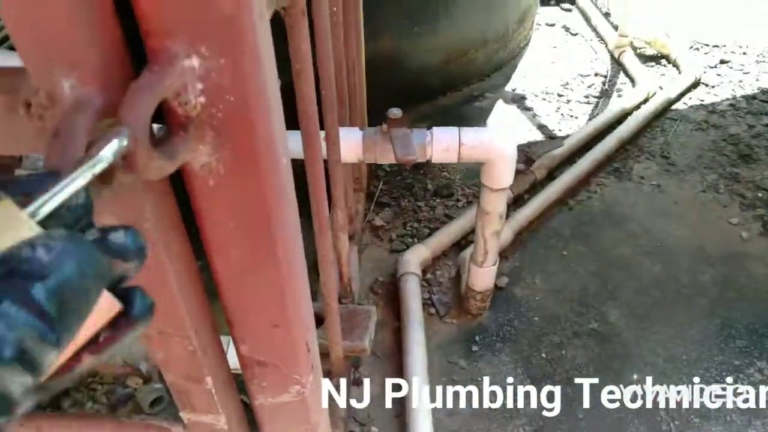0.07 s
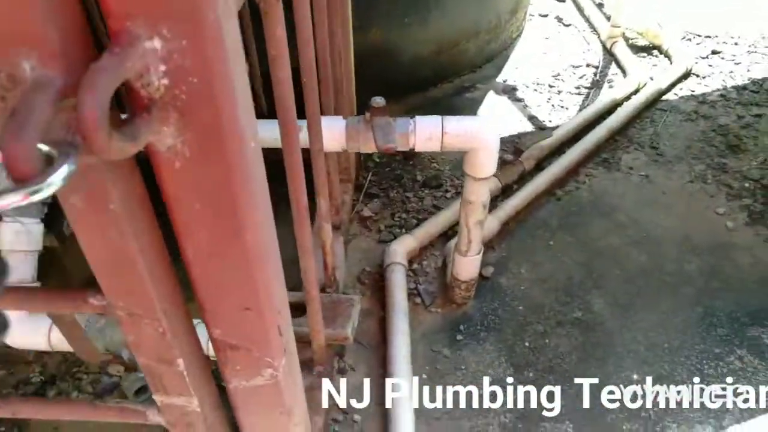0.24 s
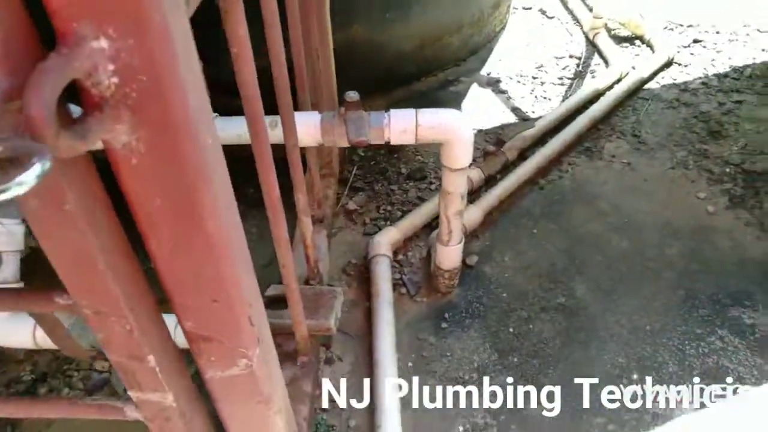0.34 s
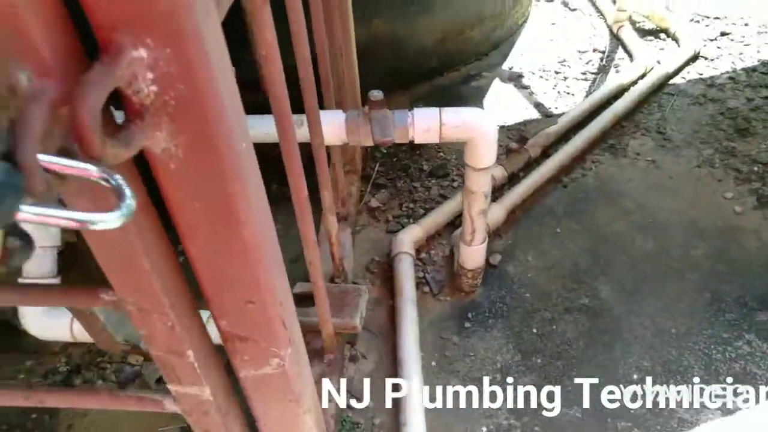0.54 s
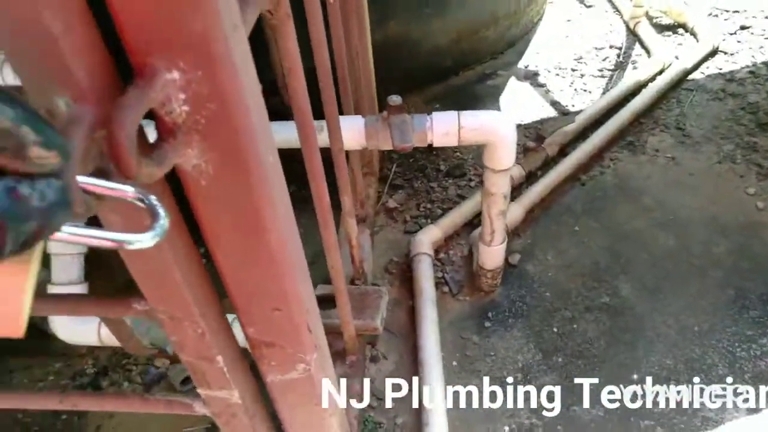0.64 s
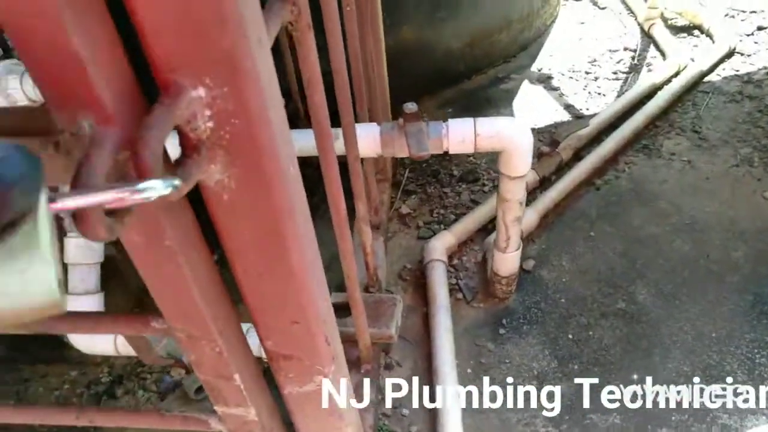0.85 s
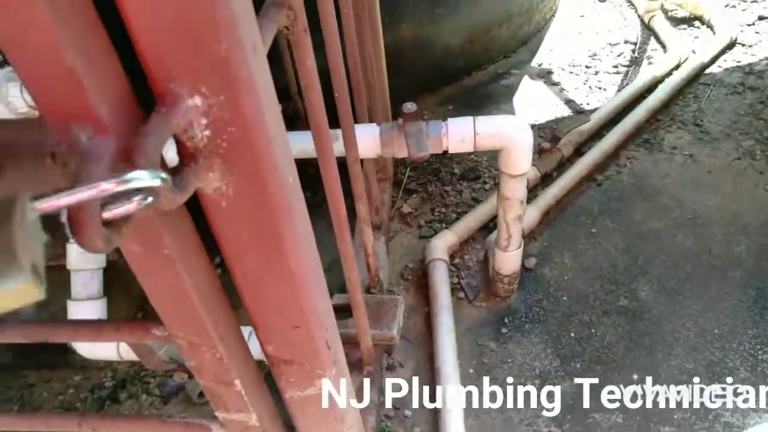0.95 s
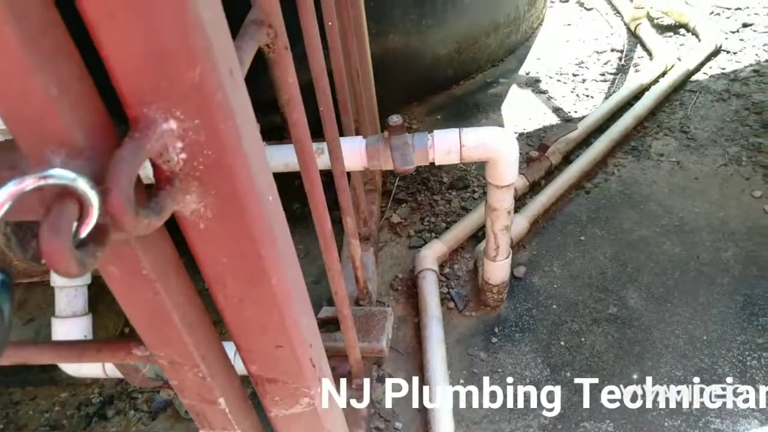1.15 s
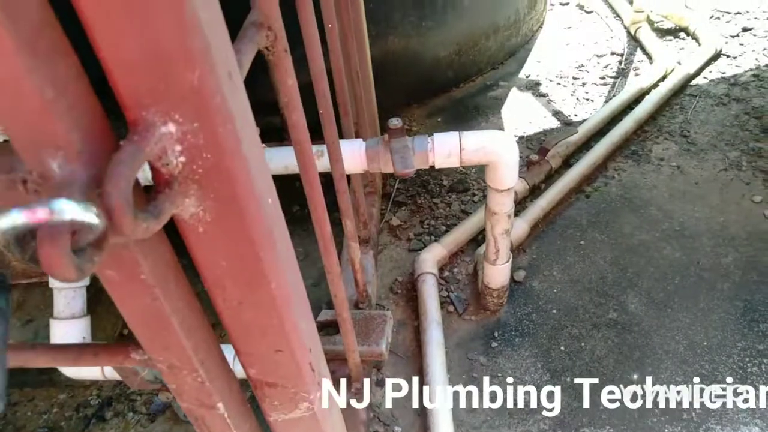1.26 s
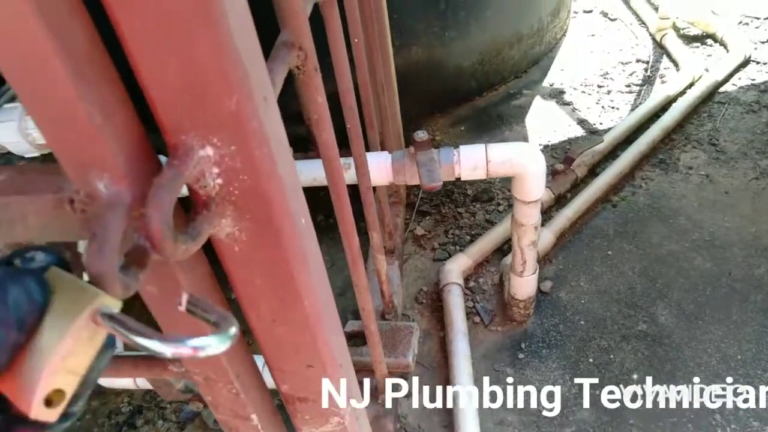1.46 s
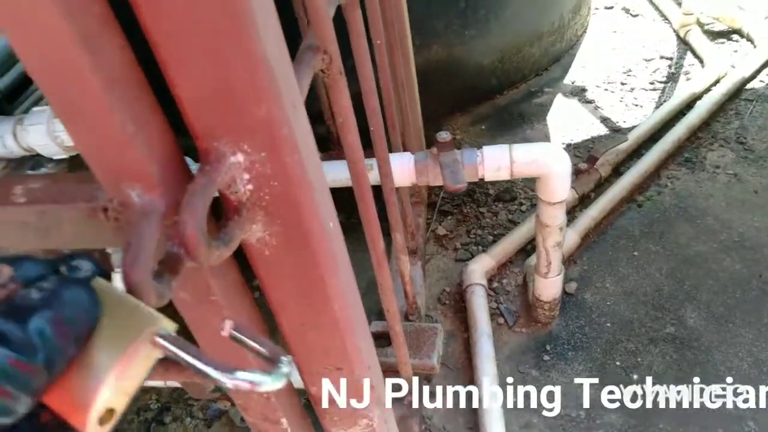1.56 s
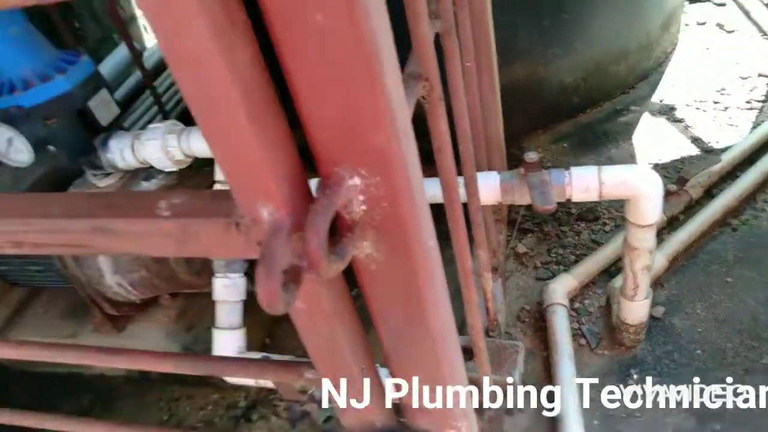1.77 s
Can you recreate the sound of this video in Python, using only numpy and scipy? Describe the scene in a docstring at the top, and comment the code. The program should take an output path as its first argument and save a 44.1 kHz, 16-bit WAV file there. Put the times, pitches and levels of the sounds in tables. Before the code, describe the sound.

Close to the microphone, a padlock knocks sharply on a gate's metal loops, ringing briefly. It then rattles and scrapes more quietly while the gate rumbles softly, ending on one lower clank. A faint, steady outdoor background lies underneath.

```python
"""Steel knocks and scrapes, close by: a padlock is worked out of the loops of a gate, outdoors.
Each time its shackle (the U-shaped bar) hits or rubs a loop, the lock rings bright and short
and the gate rings lower and longer. The smooth shackle also skids with a thin hiss.
The gate rumbles softly as it shifts, over a steady low background."""
import sys
import numpy as np
from scipy import signal
from scipy.fft import rfft, irfft
from scipy.io import wavfile

SR = 44100
rng = np.random.default_rng(int(sys.argv[2]) if len(sys.argv) > 2 else 0)


def output_pcm(signal):
    """Save a mono or channel-first signal as 16-bit PCM at the path in sys.argv[1].

    Samples are clipped to [-1, 1] before scaling.
    """
    pcm = np.clip(np.atleast_2d(signal).T, -1, 1) * 32767
    wavfile.write(sys.argv[1], SR, np.round(pcm).astype(np.int16))


N = 79380  # 1.8 seconds

# The spots where the shackle meets the gate: the loop, its rim and the post.
SPOTS = ["loop", "rim", "post"]


def padlock(spot):
    """Knocks (single pushes) and scrapes (many tiny ones) at one spot set the same steel ringing."""
    # Each row: start in seconds, spot, then the level in dB of five bands from low to high.
    knock_rows = [ (0.001, "rim", -32.5, -38, -41, -42, -58), (0.2356, "loop", -22.5, -16, -16, -12, -29.5),
                  (0.398, "rim", -24, -24, -21.5, -17, -36.5), (0.471, "rim", -52, -52, -53, -43, -65),
                  (0.507, "rim", -47, -37, -34, -30, -51), (0.600, "rim", -33.5, -42.5, -51, -42.5, -54.5),
                  (0.816, "post", -45, -42, -56, -49, -54), (0.894, "post", -34, -32.5, -37, -40, -53),
                  (0.945, "rim", -38, -41, -41.5, -48.5, -70), (1.044, "loop", -65, -66, -68, -59.5, -85),
                  (1.096, "rim", -45.5, -48.5, -52.5, -55, -90), (1.113, "loop", -55, -45, -51, -47, -77),
                  (1.166, "rim", -40.5, -41, -39, -47, -81), (1.212, "rim", -35, -48, -44.5, -39.5, -68),
                  (1.303, "post", -46.5, -42.5, -44, -47, -66),
                  (1.372, "loop", -40.5, -43.5, -41.5, -31.5, -48),
                  (1.4432, "post", -24.5, -25, -33, -41.5, -65)]
    # Each row: start in seconds, length in seconds, spot, then the same five levels in dB.
    scrape_rows = [ (0.010, 0.097, "rim", -40, -43, -50, -50.5, -74),
                   (0.178, 0.095, "loop", -48.5, -53, -56, -47, -76),
                   (0.591, 0.068, "post", -47, -51, -55, -49.5, -54),
                   (0.771, 0.03, "post", -51, -51.5, -64, -44, -51),
                   (0.895, 0.065, "loop", -42.5, -41, -44, -44, -70),
                   (1.106, 0.07, "rim", -58, -50, -52, -57, -76),
                   (1.166, 0.055, "rim", -43, -36.5, -40, -41, -65),
                   (1.298, .060, "loop", -39, -37.5, -45.5, -49, -62.5),
                   (1.384, 0.053, "rim", -39.5, -48, -54, -47.5, -60)]
    rings = steel_ring(spot)
    force = np.zeros((len(rings), N))
    for start, where, *db in knock_rows:
        if where == spot:
            force[:, int(start * SR)] += amp(db)
    for start, length, where, *db in scrape_rows:
        if where == spot:
            force += np.outer(amp(db), stick_and_slip(start, length))
    # Convolving starts a copy of the ring at every push.
    return sum(signal.fftconvolve(push, ring)[:N] for push, ring in zip(force, rings))


def steel_ring(spot):
    """One contact rings the natural tones of lock and gate. Gives five bands that start equally strong."""
    # Each entry: the pitch of one tone in Hz. Those below 3000 Hz are the gate's, the rest the lock's.
    tone_pitches = [355, 577, 603, 664, 778, 933, 997, 1096, 1130, 1190, 1221, 1295, 1403, 1440, 1474, 1617,
                    1740, 1816, 1924, 2010, 2196, 2606, 2643, 2776, 3075, 3426, 3477, 3640, 4009, 4245,
                    4930, 4980, 5652, 5836, 6659, 6772, 6955, 7495, 7748, 7991, 8154]
    # Each row, one per tone: seconds to fade by 60 dB, then level in dB when hit on loop, rim and post.
    tone_rows = [(2.5, -35.5, -41.5, -57.5), (1.0, -38.5, -38.5, -29.5), (1.34, -46, -37, -33.5),
                 (0.8, -29.5, -34.5, -40), (0.83, -27.5, -40, -30.5), (1.3, -53.5, -35.5, -38.5),
                 (1.58, -31.5, -36, -35), (1.2, -37, -35, -37), (0.31, -28, -26.5, -25),
                 (1.3, -26, -31.5, -39), (1.2, -29, -34, -37), (0.58, -42, -46.5, -30.5),
                 (2.2, -39, -35, -36.5), (0.9, -30.5, -28, -32.5), (1.2, -32, -49, -40.5),
                 (0.16, -41.5, -46.5, -24), (0.5, -27.5, -26, -44), (0.41, -26.5, -25, -24),
                 (0.53, -24, -27, -25.5), (0.81, -34.5, -35, -28.5), (0.71, -37, -49, -36),
                 (0.13, -21, -32, -33.5), (0.46, -27.5, -38, -32), (0.26, -25, -27.5, -27),
                 (0.35, -37.5, -33.5, -49), (0.25, -19.5, -30, -21), (0.24, -24, -40.5, -41),
                 (0.3, -20, -43, -21.5), (0.22, -36.5, -24.5, -42), (0.26, -28.5, -25.5, -41),
                 (0.4, -30.5, -32, -54), (0.28, -26, -30.5, -50), (0.3, -39.5, -32, -40),
                 (0.17, -42.5, -22.5, -22), (0.058, -20, -18, -49), (0.15, -27, -23, -24),
                 (0.14, -19.5, -34, -46), (0.13, -14, -17, -36), (0.22, -26.5, -16, -23),
                 (0.17, -24, -29.5, -22), (0.12, -27, -28.5, -38)]
    # Each entry: a border of the five bands in Hz, from low to high.
    band_edges = [250, 1600, 3000, 5200, 10600, 17000]
    t = np.arange(N) / SR
    onset = slice(0, SR // 40)  # the first 25 ms
    crowd = weak_tones(t)
    ring = amp(-14) * crowd / rms(crowd[onset])
    swing = waver()
    strength, phase = abs(swing), np.angle(swing)
    for hz, (t60, *db) in zip(tone_pitches, tone_rows):
        shift = rng.integers(N)  # each tone wavers in its own way
        angle = 2 * np.pi * (hz * t + rng.random()) + np.roll(phase, shift)
        tone = np.roll(strength, shift) * np.sin(angle)
        ring += amp(db[SPOTS.index(spot)]) * tone * build_up(t, hz) * fade(t, t60)
    crack = np.diff(rng.standard_normal(N + 1)) / 2  # bright noise for the instant of contact
    ring += amp(-16) * crack * np.exp(-t / .0015)
    bands = [bandpass(ring, lo, hi, order=7) for lo, hi in zip(band_edges, band_edges[1:])]
    return [band / rms(band[onset]) for band in bands]


def weak_tones(t):
    """The steel's many weaker tones blur into noise that dies away in an early and a late part."""
    # Each row: pitch in Hz, relative level in dB, seconds to fade by 60 dB for the early and late part.
    crowd_rows = [(250, -20, 1, 1.1), (450, -8, 1, 1.0), (650, -3, 0.58, 0.56), (1200, 0, 0.32, .8),
                  (1900, 2, 0.39, 0.31), (2830, -0.5, 0.23, 0.6), (4400, 4, 0.16, 0.39),
                  (5350, -5, 0.14, 0.27), (7200, 4.5, 0.087, .46), (9500, -4, .1, 0.33),
                  (12500, -22.5, .1, .55), (15500, -20.5, .07, .4)]
    row_hz, row_db, early_s, late_s = np.array(crowd_rows).T
    f = np.maximum(np.fft.rfftfreq(N, 1 / SR), 1)
    spectrum = rfft(rng.standard_normal(N)) * bunching(f) * amp(at_pitch(f, row_hz, row_db))
    edges = np.geomspace(200, 17000, 17)
    fading_time = np.maximum(t - .011, 0)  # the fade begins after 11 ms
    crowd = 0
    for lo, hi in zip(edges, edges[1:]):
        hz = np.sqrt(lo * hi)
        early = fade(fading_time, at_pitch(hz, row_hz, early_s))
        late = amp(-12.5) * fade(fading_time, at_pitch(hz, row_hz, late_s))
        band = irfft(spectrum * (f >= lo) * (f < hi), N)
        crowd += band * build_up(t, hz) * np.hypot(early, late)
    return crowd


def bunching(f, depth_db=7):
    """Weak tones bunch into random peaks and valleys, wider apart in the treble."""
    heights = np.clip(rng.standard_normal(2000), -2, 1)
    spacing_hz = 25 + .01 * f
    place = np.cumsum(1 / spacing_hz) * SR / N
    return amp(depth_db * np.interp(place, np.arange(len(heights)), heights))


def waver(depth=.68, rate_hz=28):
    """A tone wavers as it dies: random swings in its strength and its phase (place in the cycle)."""
    f = np.fft.fftfreq(N, 1 / SR)
    swing = np.fft.ifft(np.exp(2j * np.pi * rng.random(N) - (f / rate_hz) ** 2))
    return 1 + depth * swing / rms(abs(swing))


def build_up(t, hz, cycles=1.3):
    """A tone needs a few cycles to reach its strength."""
    return 1 - np.exp(-t * hz / cycles)


def fade(t, t60):
    """A vibration left alone drops by 60 dB every t60 seconds."""
    return np.exp(-np.log(1000) * t / t60)


def stick_and_slip(start, length, slips_per_s=600, spread_db=1, bite_s=.015):
    """Sliding steel catches and lets go: tiny uneven pushes, with the energy of one knock per 40 ms."""
    t = np.arange(N) / SR - start
    size = amp(-spread_db * rng.standard_normal(N)) * rng.choice([-1, 1], N)
    slipping = rng.random(N) < slips_per_s / SR
    pushes = size * slipping * np.clip(t / bite_s, 0, 1) * (t < length)
    return pushes / (rms(pushes) * np.sqrt(N)) * np.sqrt(length / .04)


def grazing_ticks(decay_s=.0012):
    """The shackle grazes the loop just before the first loud clank, with hardly any ring."""
    # Each row: start in seconds, level in dB.
    tick_rows = [(0.2145, -49), (0.2278, -21)]
    t = np.arange(N) / SR
    grain = bandpass(rng.standard_normal(N), lo_hz=1680, hi_hz=8500)
    loudness = sum(amp(db) * (t >= start) * np.exp(-abs(t - start) / decay_s) for start, db in tick_rows)
    return grain / rms(grain) * loudness


def shackle_skids():
    """The smooth shackle skids with a thin hiss."""
    # Each row: start in seconds, length in seconds, pitch in Hz, band width in Hz, level in dB.
    skid_rows = [(.585, .10, 8700, 2200, -44.5), (.66, 0.13, 8500, 1200, -53),
                 (.772, 0.049, 8830, 2400, -42), (.892, 0.039, 10160, 900, -46.5)]
    return noise_swells(skid_rows)


def gate_rumble():
    """The gate rumbles softly as it shifts."""
    # Each row: start in seconds, length in seconds, pitch in Hz, band width in Hz, level in dB.
    shift_rows = [(.60, .15, 195, 81.32, -34), (.61, 0.31, 101, 35.2, -41.5), (.76, 0.27, 240, 141, -43),
                  (0.974, 0.14, 286.3, 25, -42.5), (1.0, 0.17, 354, 25, -42.5)]
    return noise_swells(shift_rows)


def background():
    """A steady outdoor rumble and a faint, distant hiss."""
    # Each row of both tables: pitch in Hz, relative level in dB.
    rumble_shape = [(25, -32.5), (45, -13.5), (65, -3.5), (100, 1), (135, -3), (180, -0.5), (240, -9),
                    (300, 0.5), (360, -6), (500, -9.5)]
    hiss_shape = [(300, -11.5), (550, 9.5), (1200, -2), (2000, -14.5), (3500, -37), (5500, -35),
                  (7500, -22.5), (11000, -35), (16000, -32)]
    return amp(-43) * steady_noise(rumble_shape) + amp(-51.5) * steady_noise(hiss_shape)


def noise_swells(rows):
    """Each row makes a band of noise that swells and fades once."""
    t = np.arange(N) / SR
    total = 0
    for start, length, hz, width, db in rows:
        band = bandpass(rng.standard_normal(N), hz - width / 2, hz + width / 2, order=2)
        progress = np.clip((t - start) / length, 0, 1)
        total += amp(db) * band / rms(band) * np.sqrt(abs(np.sin(np.pi * progress)))
    return total


def steady_noise(points):
    """Noise of average level 1, shaped by (Hz, dB) points and falling away beyond them."""
    hz, db = np.array(points).T
    f = np.maximum(np.fft.rfftfreq(N, 1 / SR), 1)
    roll_off = np.minimum(1, np.minimum(f / hz[0], hz[-1] / f)) ** 4
    shaped = irfft(rfft(rng.standard_normal(N)) * roll_off * amp(at_pitch(f, hz, db)), N)
    return shaped / rms(shaped)


def at_pitch(hz, row_hz, values):
    """Read a value between a table's rows, giving each octave equal room."""
    return np.interp(np.log(hz), np.log(row_hz), values)


def bandpass(x, lo_hz, hi_hz, order=3):
    """Keep the sound between two pitches."""
    return signal.sosfilt(signal.butter(order, [lo_hz, hi_hz], "band", fs=SR, output="sos"), x)


def amp(db):
    """Turn decibels into a multiplier."""
    return 10 ** (np.asarray(db) / 20)


def rms(x):
    """The average level of a signal."""
    return np.sqrt(np.mean(x ** 2)) + 1e-12


def scene():
    """Add all the sounds into one channel."""
    clanks = sum(padlock(spot) for spot in SPOTS)
    return (clanks + grazing_ticks() + shackle_skids() + gate_rumble() + background())[None]


def record(dry):
    """Round off the loudest peaks and cut the highest treble."""
    ceiling, top_hz = .9, 15700
    rounded = ceiling * np.tanh(dry / ceiling)
    return signal.sosfilt(signal.ellip(8, .2, 70, top_hz, fs=SR, output="sos"), rounded)


dry = scene()
out = record(dry)
output_pcm(out)
```